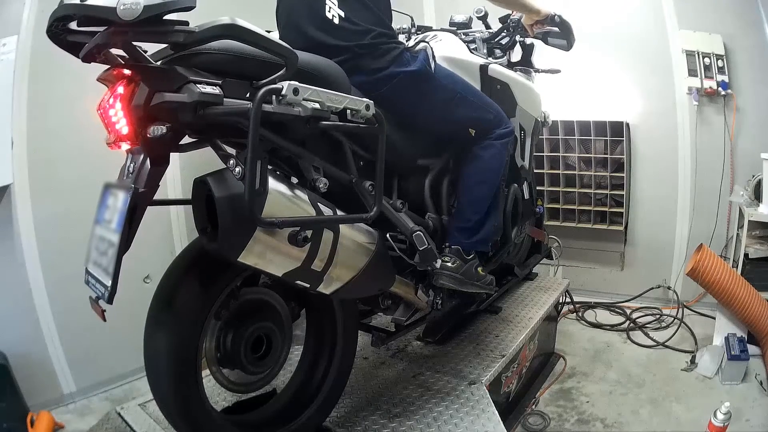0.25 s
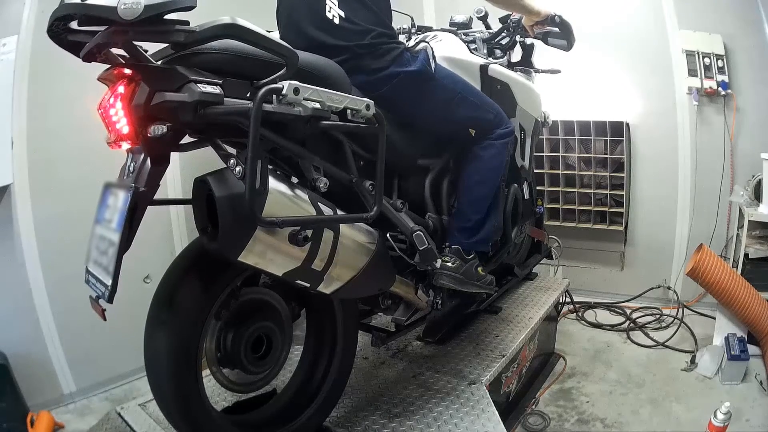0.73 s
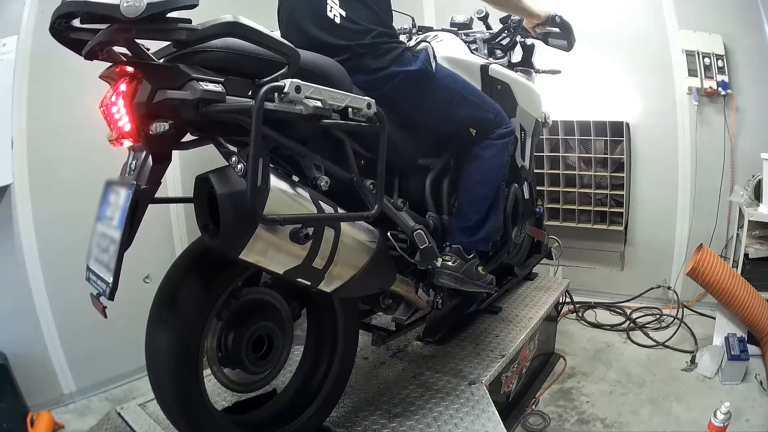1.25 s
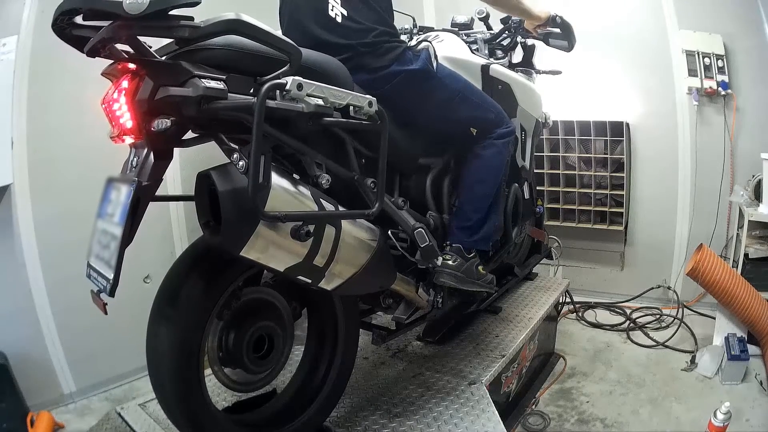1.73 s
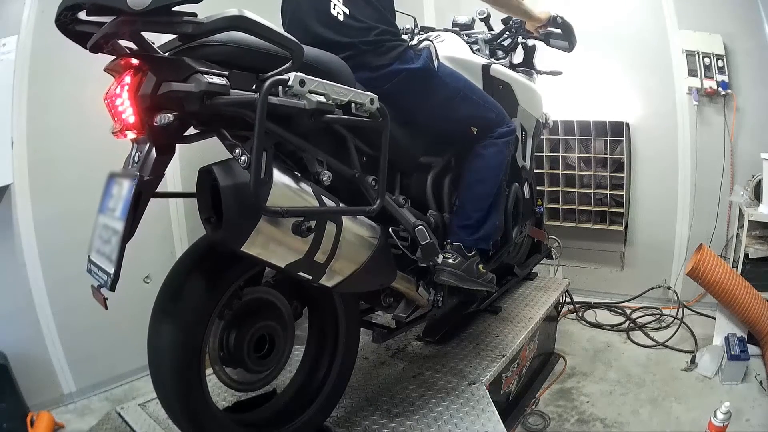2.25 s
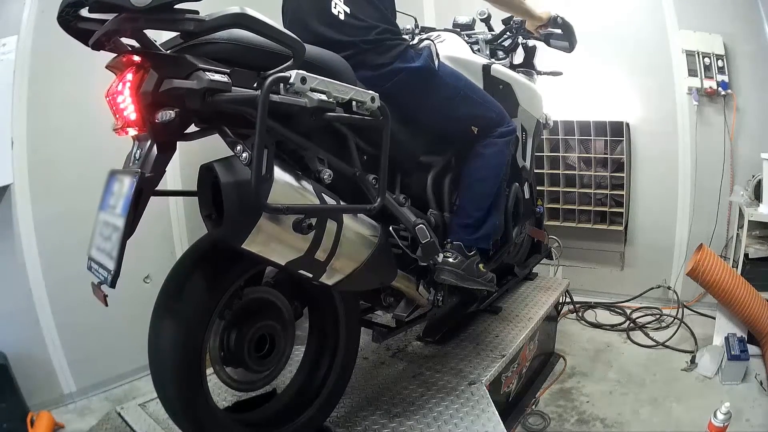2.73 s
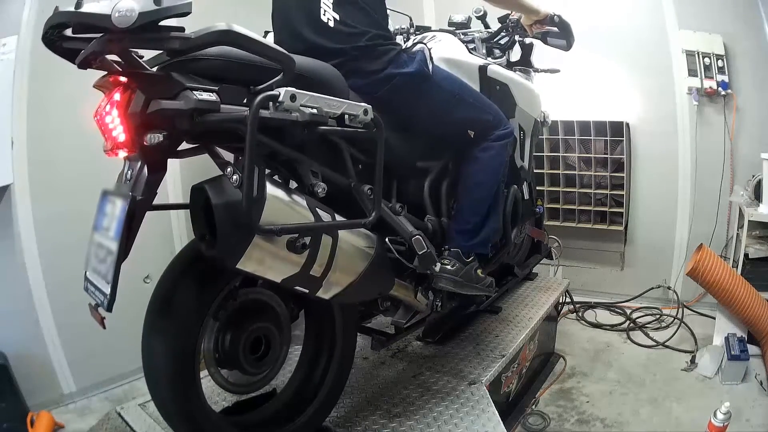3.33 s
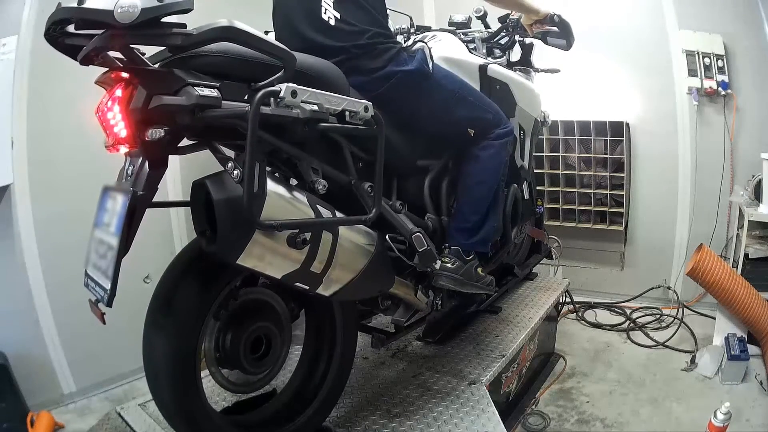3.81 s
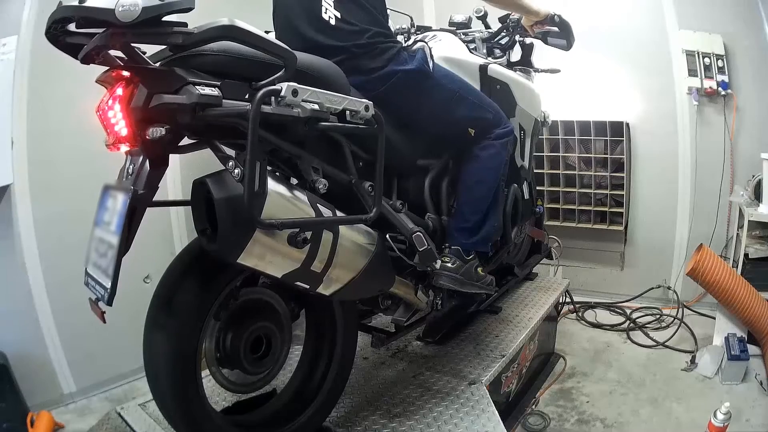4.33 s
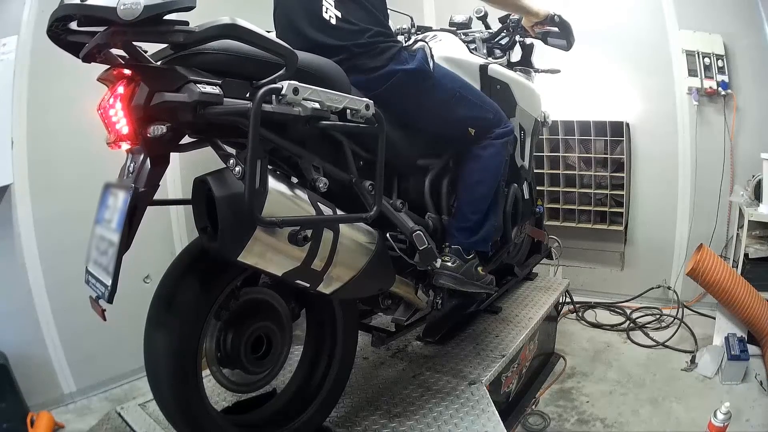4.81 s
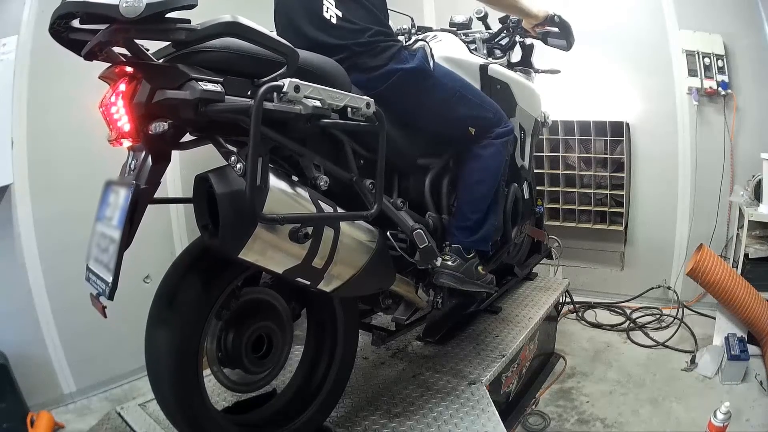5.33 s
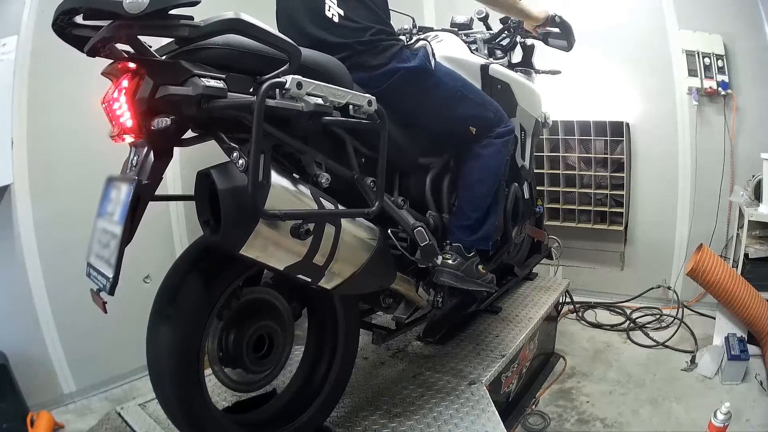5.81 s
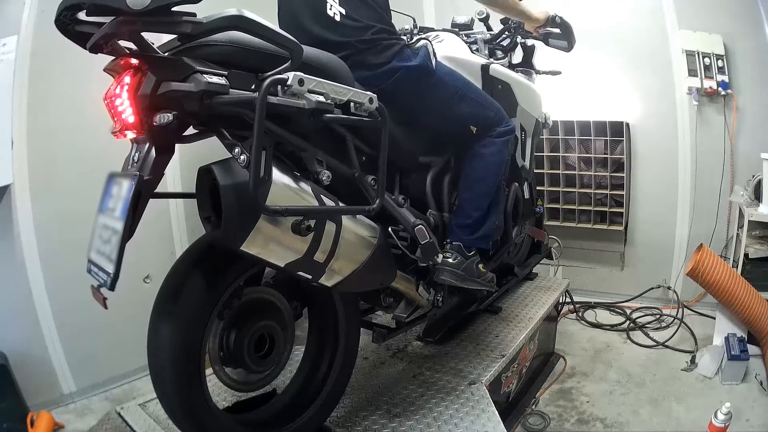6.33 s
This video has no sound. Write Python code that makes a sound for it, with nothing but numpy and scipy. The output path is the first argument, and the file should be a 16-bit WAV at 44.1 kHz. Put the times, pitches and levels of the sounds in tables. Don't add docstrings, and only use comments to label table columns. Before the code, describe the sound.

A three-cylinder motorcycle accelerates on a roller bench in a small hard-walled workshop. Its buzzing, nasal exhaust note climbs for nearly three seconds, cuts briefly with soft driveline thuds and a small throttle blip, then resumes lower and climbs again. Gear whine and a loud steady hiss of exhaust, chain and tyre cover it. A close, thin-bass microphone makes everything bright, nearly mono.

```python
import sys
import numpy as np
from scipy import signal
from scipy.fft import rfft, irfft, next_fast_len
from scipy.io import wavfile

SR = 44100
rng = np.random.default_rng(int(sys.argv[2]) if len(sys.argv) > 2 else 0)


def volts_from_decibels(level):
    exponent = np.asarray(level, float) / 20
    return 10 ** exponent


def log_audio(samples):
    frames = np.atleast_2d(samples).T
    limited = np.clip(frames, -1, 1)
    pcm = np.round(limited * 32767).astype(np.int16)
    wavfile.write(sys.argv[1], SR, pcm)


N = 289737
CONTROL = 64
SHIFT_S, CLUTCH_HOME_S = 2.86, 3.45


def rms_one(x):
    return x / np.sqrt(np.mean(x ** 2) + 1e-20)


def in_time(rows, step=1):
    s, *columns = np.transpose(rows)
    t = np.arange(0, N + step - 1, step) / SR
    return [np.interp(t, s, column) for column in columns]


def full(coarse):
    return np.interp(np.arange(N) / CONTROL, np.arange(len(coarse)), coarse)


def at_hz(points, hz):
    point_hz, db = np.transpose(points)
    return np.interp(np.log(hz + 1), np.log(point_hz), db)


def lift_db(modes, hz):
    return sum(db / (1 + (2 * (hz - centre_hz) / width) ** 2) for centre_hz, width, db in modes)


def drift(rate_hz):
    r = np.exp(-2 * np.pi * rate_hz * CONTROL / SR)
    wander = signal.lfilter([1], [1, -2 * r, r * r], rng.standard_normal(N // CONTROL + 1002))
    return rms_one(wander[1000:])


# time in seconds, firings per second.
SPEED = [(0, 118), (.6, 123.3), (.9, 126.8), (1.3, 134.3), (1.65, 142.8), (2.05, 155.4), (2.84, 185),
         (3.135, 140.5), (3.17, 141.5), (3.24, 149.6), (3.38, 150.9), (3.43, 144.2), (3.5, 146.8),
         (4.2, 149.1), (4.8, 154.2), (5.3, 160.9), (5.75, 170), (6.57, 191.2)]
# time in seconds, effort in dB, boom of the firing tone in dB.
LOAD = [(0, -7.5, -47), (.3, -7, -53), (.7, -6.5, -56), (1.05, -3.5, -47), (1.4, 2.5, -44), (1.7, 7, -39),
        (2.05, 9.5, -36), (2.4, 5, -37.5), (2.83, 7, -39), (2.875, -1.5, -56), (2.93, -5, -41.5),
        (3.22, -3.5, -40.5), (3.37, -1, -72), (3.48, -3.5, -60), (4.3, 0, -55.5), (4.85, 0.5, -44),
        (5.5, 4, -38.5), (6.57, 4.5, -37)]


def follow(base_db, effort_share, wheel_share):
    rate, effort_db = in_time(SPEED, CONTROL)[0], in_time(LOAD, CONTROL)[0]
    second_gear = np.arange(len(rate)) * CONTROL > CLUTCH_HOME_S * SR
    wheel = np.maximum.accumulate(rate * np.where(second_gear, 1.26, 1))
    return base_db + effort_share * effort_db + wheel_share * 20 * np.log10(wheel / wheel[0])


def shut_db():
    t = np.arange(N // CONTROL + 2) * CONTROL / SR
    moments = [SHIFT_S - .02, SHIFT_S + .02, CLUTCH_HOME_S - .2, CLUTCH_HOME_S]
    return np.interp(t, moments, [0, -7, -7, 0])


def workshop(x):
    t60_s, wet_db = .3, -13
    size = next_fast_len(N + SR)
    turn = -2j * np.pi * np.arange(size // 2 + 1) / size
    wet = 0
    for k, lag in enumerate((rng.uniform(.011, .04, 10) * SR).astype(int)):
        loop = volts_from_decibels(-60 * lag / SR / t60_s) * np.exp(turn * lag)
        wet = wet + (-1) ** k * loop / (1 - loop)
    return irfft(rfft(x, size) * (1 + volts_from_decibels(wet_db) * wet), size)[:N]


# centre in Hz, width in Hz, lift in dB.
PIPE = [(145, 24, -14), (313, 57, 2.5), (527, 21, 4), (687, 59, 3.5), (790, 50, 1.5), (972, 25, 6),
        (1096, 184, -9), (1272, 76, 1), (1352, 110, -11.5), (1504, 80, -10.5), (1694, 27, 3),
        (1876, 28, 6.5), (1950, 32, -1.5), (2020, 120, 6), (2143, 28, -6), (2250, 31, 1), (2417, 24, 2),
        (2865, 58, 5), (3330, 28, -2), (3720, 35, 1), (4270, 150, -1), (4480, 32, -3)]


def noise(spectrum, pipe_share, patchy_db):
    hz = np.arange(N // 2 + 1) * SR / N
    coloured = rfft(rng.standard_normal(N)) * volts_from_decibels(at_hz(spectrum, hz) + pipe_share * lift_db(PIPE, hz))
    place = 2 * np.log2(hz + 1)
    first, last = int(2 * np.log2(spectrum[0][0])), int(2 * np.log2(spectrum[-1][0]))
    out, together = 0, drift(6.5)
    for k in range(first, last + 2):
        band = irfft(coloured * np.clip(1 - abs(place - k), 0, 1), N)
        out = out + band * full(volts_from_decibels(patchy_db * (0.41 * together + drift(15))))
    return rms_one(out)


def throb(firings, pulses):
    return np.cos(2 * np.pi * pulses / 3 * firings + pulses)


# frequency in Hz, density in dB per Hz.
RUMBLE = [(12, -55), (20, -11), (65, -12), (135, -5), (181, -10), (308, -5.5), (791, -5), (944, 3.5),
          (1040, -6), (1200, 6.5), (1350, -26), (1770, -26), (2200, -12.5), (2860, -40), (4840, -120)]


def rumble():
    level_db = full(follow(-44, effort_share=.14, wheel_share=.36))
    return volts_from_decibels(level_db) * noise(RUMBLE, pipe_share=.44, patchy_db=1.0)


# frequency in Hz, density in dB per Hz.
RUSH = [(880, -30.5), (1500, -20), (2000, -18), (2180, -11.5), (2750, -3.5), (3170, 1.5), (3520, 0),
        (4130, -11), (4840, -6.5), (6500, -21), (8450, -22), (14300, -120)]


def rush(firings):
    level_db = full(follow(-19.5, effort_share=.11, wheel_share=.83)) - 2.5
    beat = 1 + .12 * throb(firings, 3) + .09 * throb(firings, 1)
    return volts_from_decibels(level_db) * noise(RUSH, pipe_share=.25, patchy_db=.35) * beat


# frequency in Hz, density in dB per Hz.
HISS = [(3180, -11.5), (5400, -2), (6510, -4), (7450, -2.5), (9500, -1.5), (12400, -31), (20900, -120)]


def hiss(firings):
    level_db = full(follow(-26.5, effort_share=.51, wheel_share=0) + .2 * shut_db())
    beat = 1 + .04 * throb(firings, 3) + .03 * throb(firings, 1)
    return volts_from_decibels(level_db) * noise(HISS, pipe_share=0, patchy_db=.35) * beat


# frequency in Hz, density in dB per Hz.
SIZZLE = [(7500, -17.5), (9000, -8.5), (10500, 0.5), (12000, 0.5), (14200, 2.5), (15200, -4.5), (15600, 1),
          (15800, -14), (16100, -46)]


def sizzle(firings):
    level_db = full(follow(-18.5, effort_share=.45, wheel_share=-.23))
    beat = 1 + .055 * throb(firings, 3) + .04 * throb(firings, 2)
    return volts_from_decibels(level_db) * noise(SIZZLE, pipe_share=0, patchy_db=.35) * beat


# start in seconds, peak in dB, pitch in Hz, t60 in seconds.
KNOCKS = [
    (2.884, -34, 112, .13),
    (3.215, -33, 122, .13),
    (3.385, -37, 112, .12),
]


def knocks():
    out = np.zeros(N)
    for s, db, hz, t60 in KNOCKS:
        t = np.maximum(np.arange(N) / SR - s, 0)
        out += volts_from_decibels(db - 60 * t / t60) * (1 - np.exp(-t / 0.0073)) * np.sin(2 * np.pi * hz * t)
    return out


# multiple of the firing rate, level in dB rms.
LOW_GEAR = [(19.92, -36), (29.88, -45), (39.83, -42), (49.83, -48), (59.7, -50)]
HIGH_GEAR = [(3.25, -58), (3.37, -53), (7.42, -54), (7.68, -51), (14.46, -45), (15.42, -42), (15.83, -39),
             (16.21, -41), (17.58, -38), (25.88, -48), (26.88, -46), (27.75, -46), (34.29, -52)]
# centre in Hz, width in Hz, lift in dB.
GEARBOX = [(4620, 250, 8), (6100, 600, 10), (6800, 600, 8), (9250, 500, 8)]


def gears(firings, flicker_db, waver):
    t, rate = np.arange(N) / SR, in_time(SPEED, CONTROL)[0]
    load_db = follow(0, effort_share=.37, wheel_share=.2)
    out = np.zeros(N)
    for table, engaged in ((LOW_GEAR, t < SHIFT_S), (HIGH_GEAR, t > CLUTCH_HOME_S)):
        for multiple, db in table:
            level_db = db + load_db + lift_db(GEARBOX, multiple * rate) + flicker_db * drift(1.8)
            phase = 2 * np.pi * multiple * firings + waver * multiple * full(drift(12))
            out += engaged * full(volts_from_decibels(level_db)) * np.sin(phase)
    return out


FIRING_OVERTONES = [7.3, 3, 4.1, 6.8, 6.6, 6.3, 5.8, 4.3, 4.6, 7.1, 4.1, 7.1, 1.5, 4.3]


def line_db(k):
    if k % 3 == 0:
        last = len(FIRING_OVERTONES) + 2
        fade_db = 0.37 * max(k // 3 - last, 0)
        return FIRING_OVERTONES[min(k // 3, last) - 3] - fade_db
    if k < 3:
        return {1: -11, 2: 14}[k]
    uneven_db = -1.76 * (-1) ** (k % 3)
    return -4 + 0.0456 * k + uneven_db


# frequency in Hz, level in dB rms.
SILENCER = [(40, -88), (100, -80), (250, -62), (400, -60), (600, -57), (800, -56), (1200, -41), (1500, -50),
            (1800, -54), (2200, -47), (2700, -37), (3200, -34), (3800, -42), (4600, -49)]


def overtones(firings, flicker_db):
    cycle_hz, out = in_time(SPEED, CONTROL)[0] / 3, np.zeros(N)
    low_db = in_time(LOAD, CONTROL)[0]
    high_db = follow(0, effort_share=.37, wheel_share=.2)
    closed_db = shut_db()
    for k in range(1, 116):
        if k in (3, 6):
            continue
        hz = k * cycle_hz
        high = 1 / (1 + (2160 / hz) ** 6)
        level_db = line_db(k) + closed_db + at_hz(SILENCER, hz) + lift_db(PIPE, hz)
        level_db += low_db + high * (high_db - low_db)
        level_db += flicker_db * (1 + high) * drift(2.9)
        out += full(volts_from_decibels(level_db)) * np.sin(2 * np.pi * (k / 3 * firings + .78 * rng.random()))
    return out


# frequency in Hz, lift in dB.
OCTAVE_ROOM = [(236, 4.5), (255, 2.5), (272, -5.5), (290, -1), (345, 1), (370, -4.5), (384, -9)]


def tones(firings):
    first_db = in_time(LOAD)[1]
    octave_db = full(follow(-41.5, effort_share=.84, wheel_share=0))
    octave_db = octave_db + at_hz(OCTAVE_ROOM, 2 * in_time(SPEED)[0])
    first = volts_from_decibels(first_db) * np.sin(2 * np.pi * firings)
    octave = volts_from_decibels(octave_db) * np.sin(4 * np.pi * firings + 1)
    return np.sqrt(2) * (first + octave)


def scene():
    firings = np.cumsum(in_time(SPEED)[0]) / SR
    lines = overtones(firings, flicker_db=1.0) + gears(firings, flicker_db=2, waver=.02)
    lines = np.sqrt(2) * volts_from_decibels(-1.0) * workshop(lines)
    gas = rumble() + rush(firings) + hiss(firings) + sizzle(firings)
    return np.tile(gas + knocks() + lines + tones(firings), (2, 1))


WIDE_PATCHES = [.19, .375, .955, 1.885, 2.14, 2.185, 2.395, 2.535, 2.67, 3.28, 3.95, 4.695, 5.135, 5.205,
                5.32, 5.575, 6.04, 6.11, 6.365, 6.48]


def widen_treble(dry, wet):
    size = 2048
    khz, window = np.arange(size // 2 + 1) * SR / size / 1000, signal.windows.tukey(size, .9)
    for s in WIDE_PATCHES:
        lows = rng.uniform(4.2, 14.4, (2, 1))
        band = ((khz > lows) & (khz < lows + 1.5)).any(axis=0)
        frame = slice(int(s * SR) - size // 2, int(s * SR) + size // 2)
        level = np.std(irfft(rfft(dry[0, frame]) * band))
        fill = rms_one(irfft(rfft(rng.standard_normal(size)) * band))
        wet[:, frame] += volts_from_decibels(-4.5) * level * window * fill * [[1], [-1]]
    return wet


def top_cut(x):
    return signal.sosfilt(signal.butter(12, 15800, fs=SR, output="sos"), x)


def record(dry):
    rounded = 1.3 * np.tanh(dry / 1.3)
    return top_cut(widen_treble(dry, rounded))


dry = scene()
out = record(dry)
log_audio(out)
```